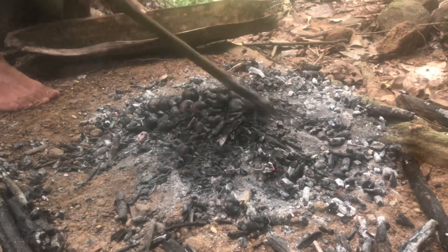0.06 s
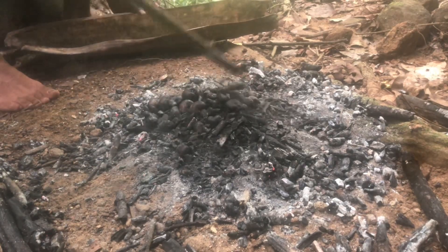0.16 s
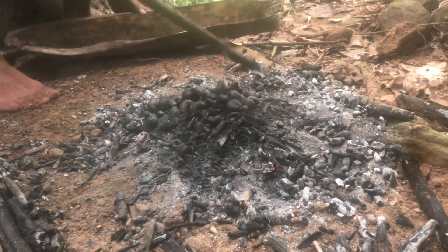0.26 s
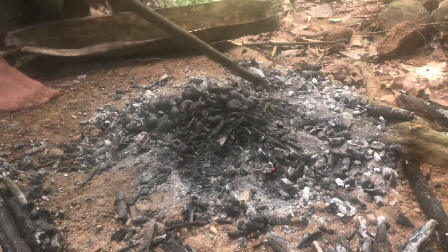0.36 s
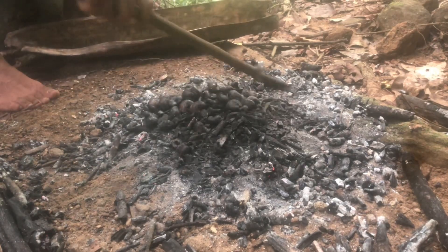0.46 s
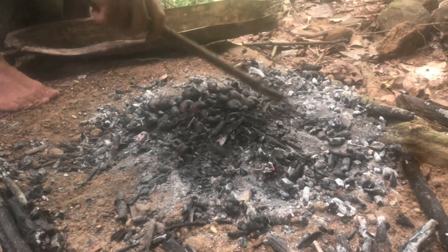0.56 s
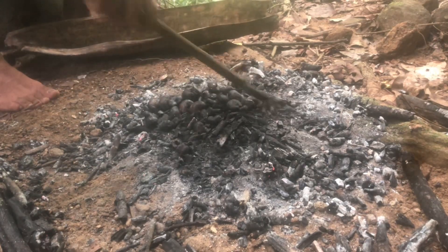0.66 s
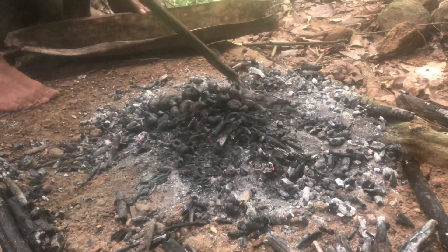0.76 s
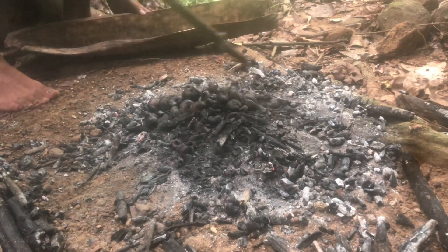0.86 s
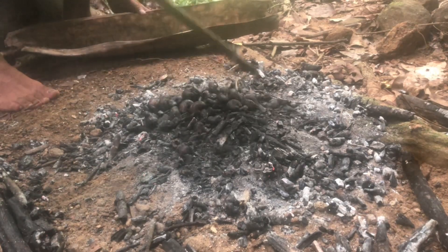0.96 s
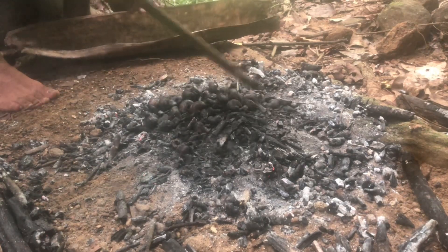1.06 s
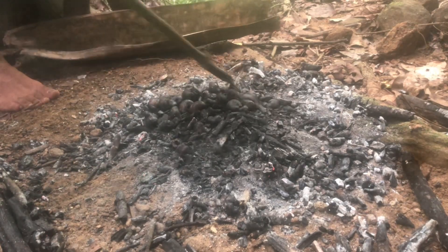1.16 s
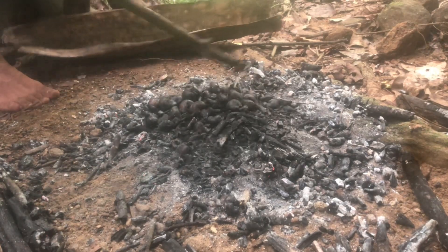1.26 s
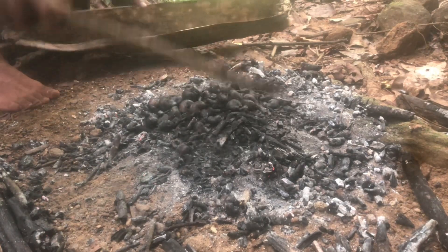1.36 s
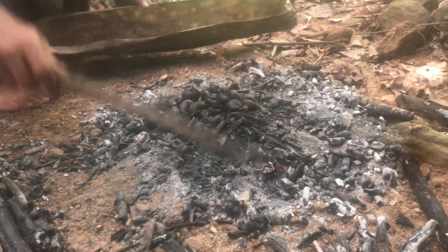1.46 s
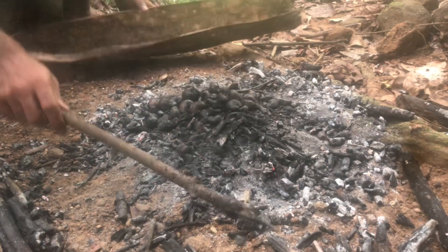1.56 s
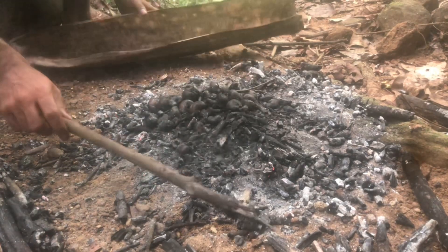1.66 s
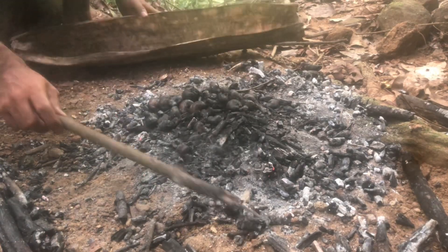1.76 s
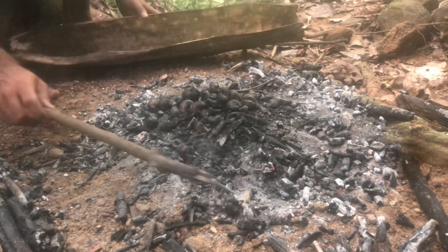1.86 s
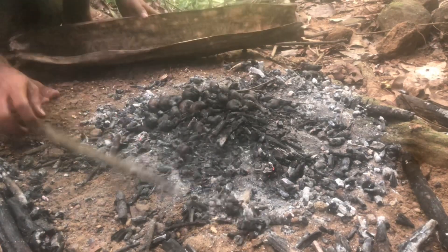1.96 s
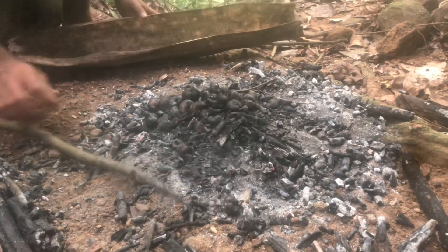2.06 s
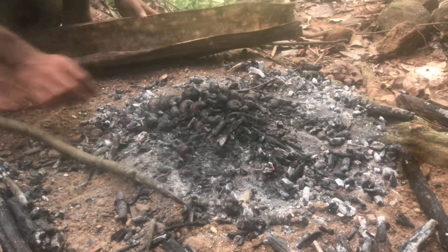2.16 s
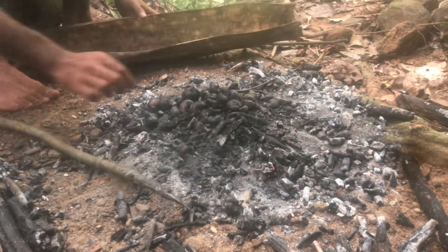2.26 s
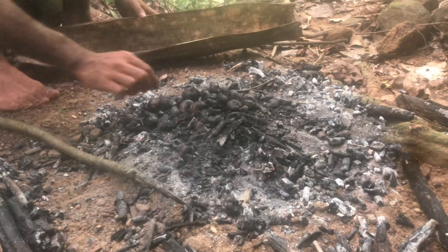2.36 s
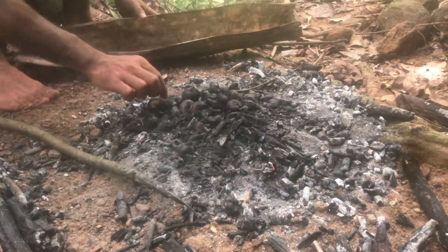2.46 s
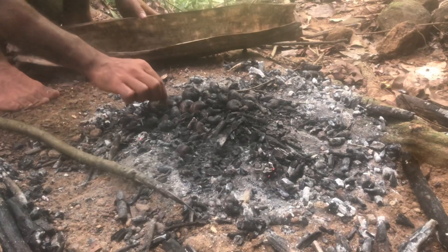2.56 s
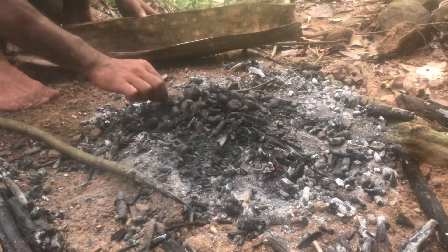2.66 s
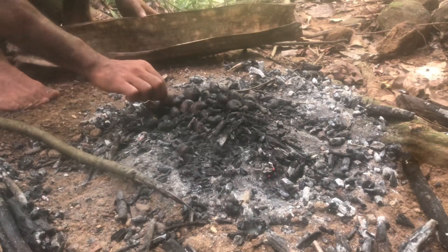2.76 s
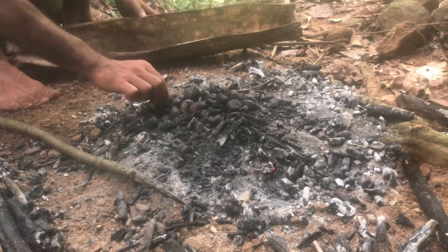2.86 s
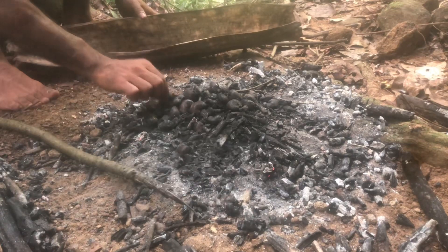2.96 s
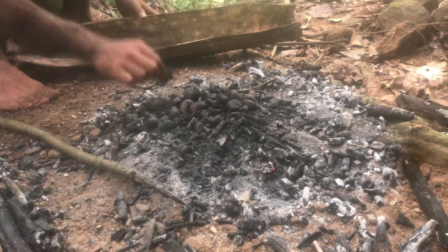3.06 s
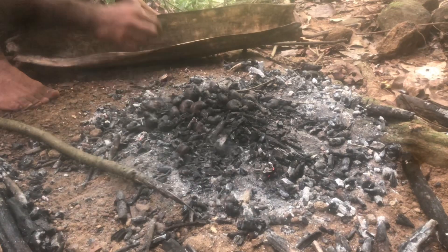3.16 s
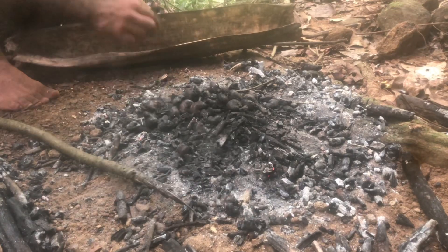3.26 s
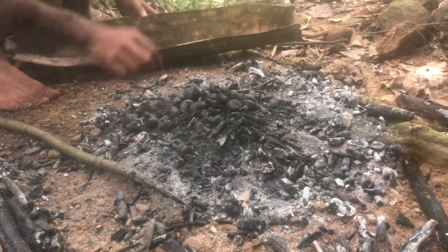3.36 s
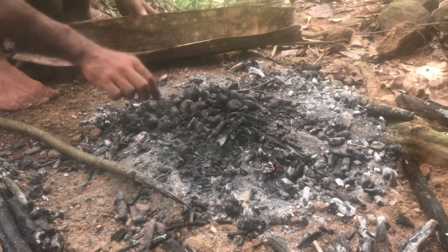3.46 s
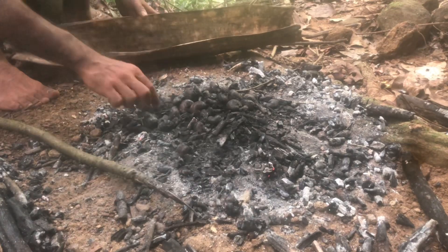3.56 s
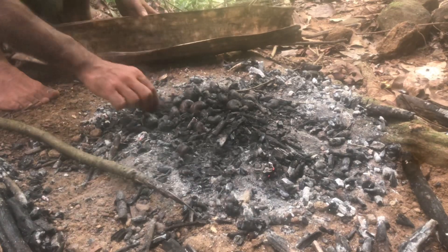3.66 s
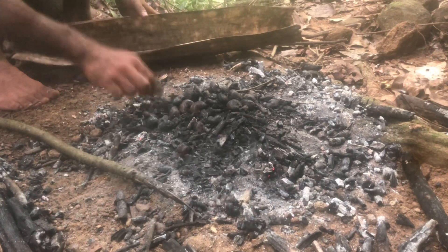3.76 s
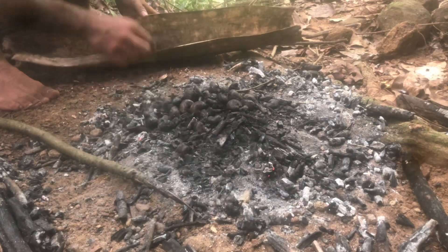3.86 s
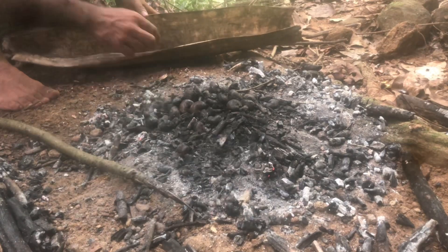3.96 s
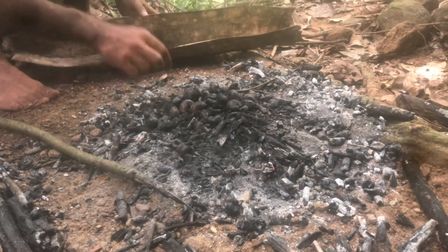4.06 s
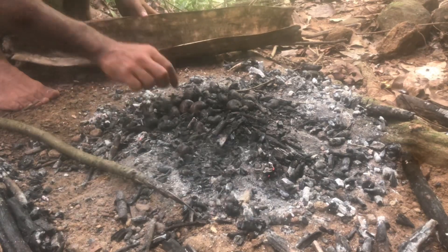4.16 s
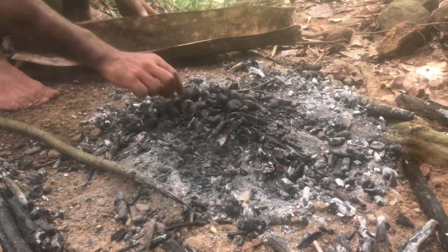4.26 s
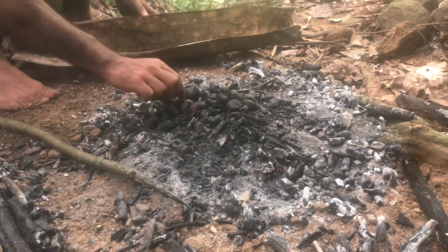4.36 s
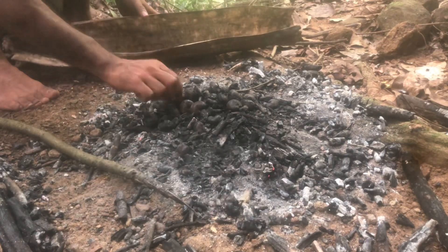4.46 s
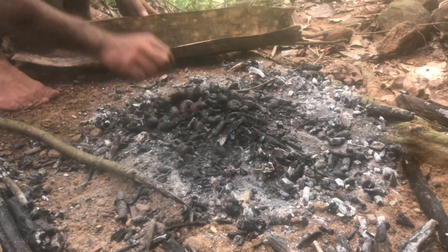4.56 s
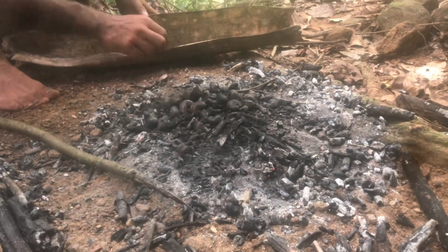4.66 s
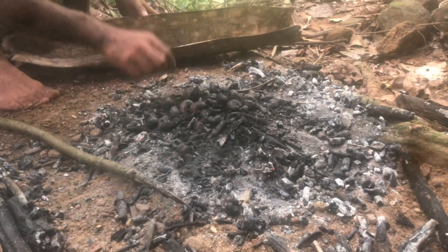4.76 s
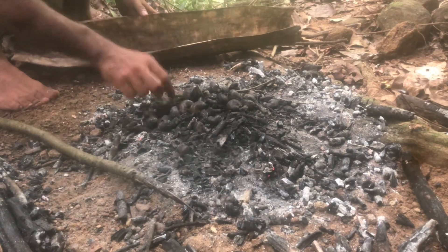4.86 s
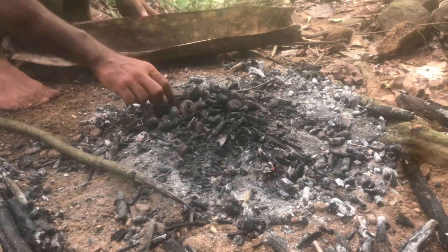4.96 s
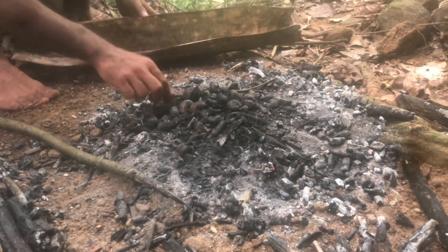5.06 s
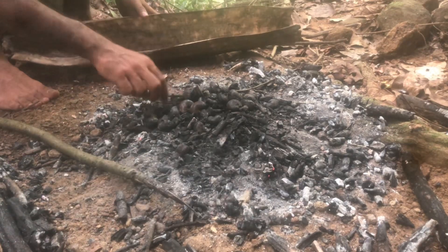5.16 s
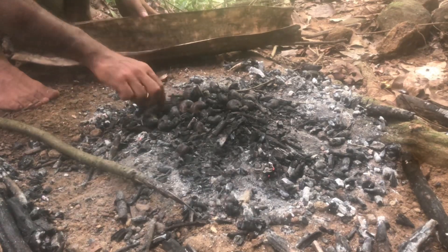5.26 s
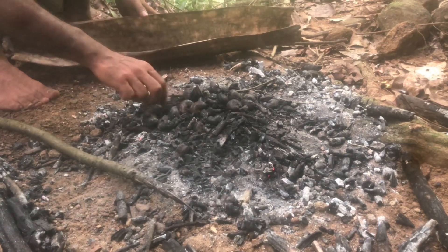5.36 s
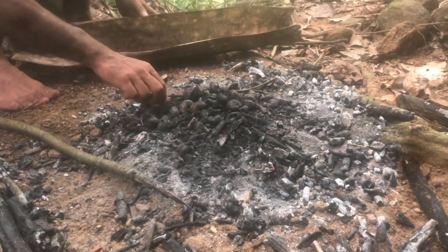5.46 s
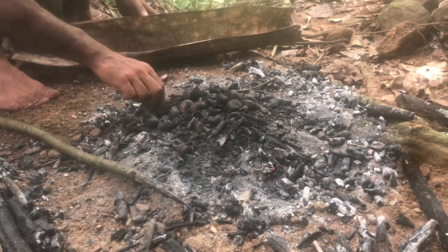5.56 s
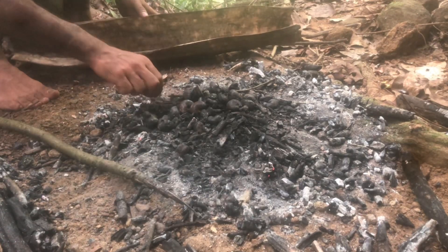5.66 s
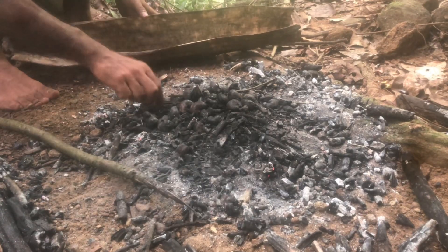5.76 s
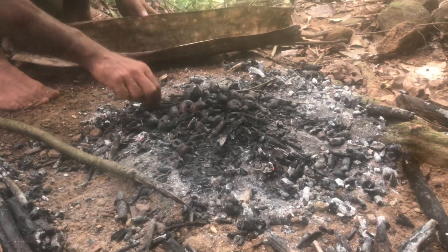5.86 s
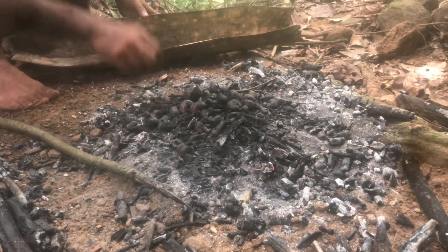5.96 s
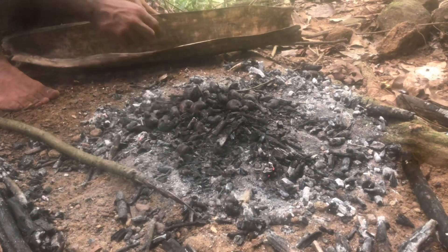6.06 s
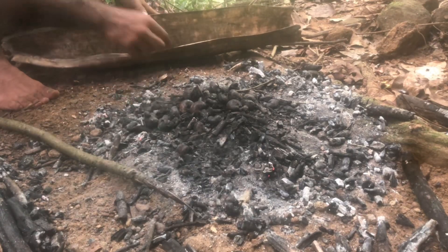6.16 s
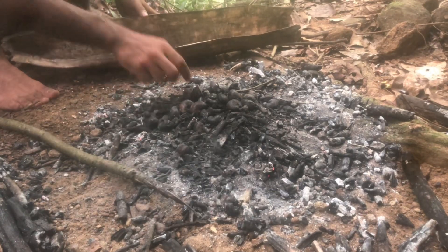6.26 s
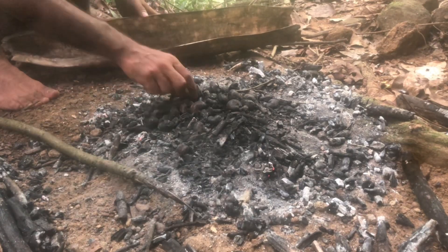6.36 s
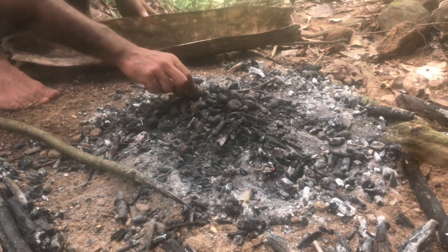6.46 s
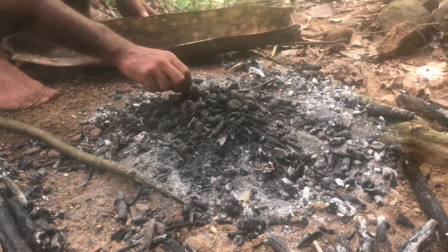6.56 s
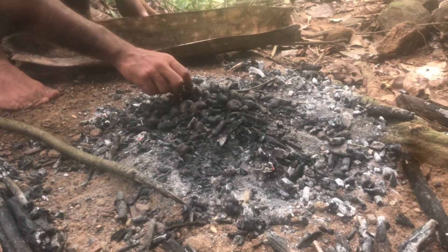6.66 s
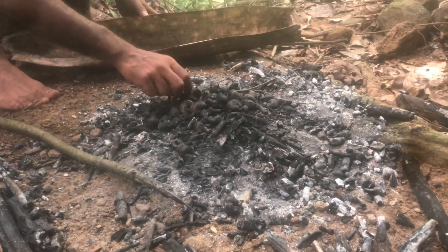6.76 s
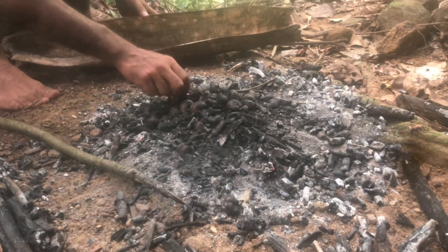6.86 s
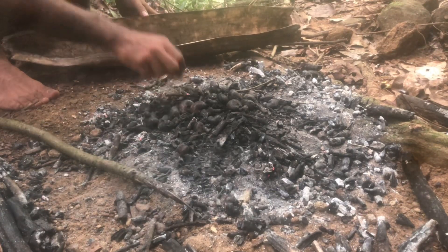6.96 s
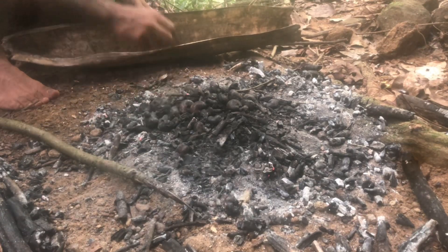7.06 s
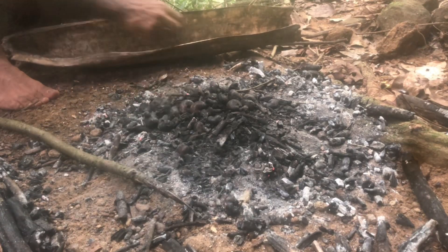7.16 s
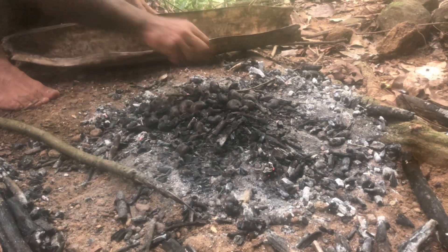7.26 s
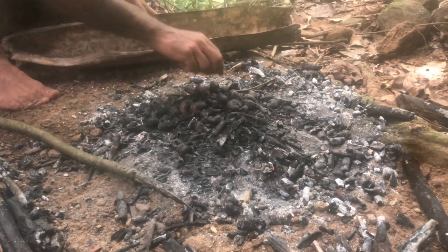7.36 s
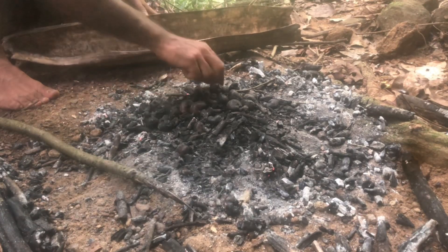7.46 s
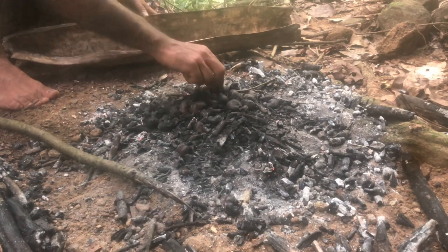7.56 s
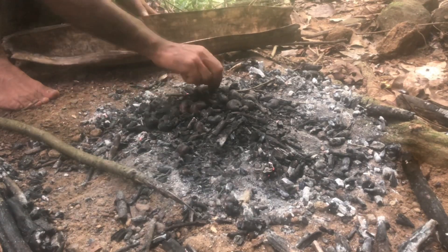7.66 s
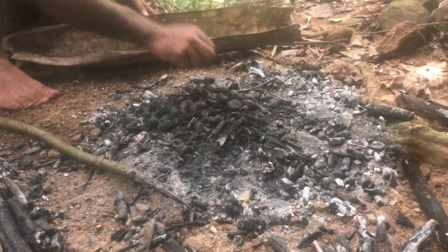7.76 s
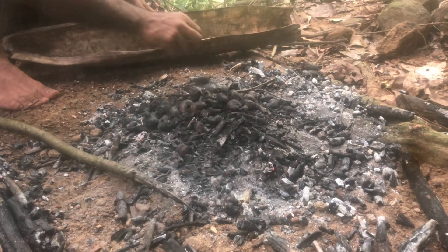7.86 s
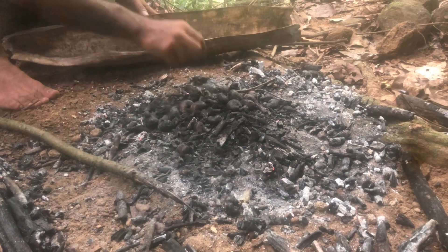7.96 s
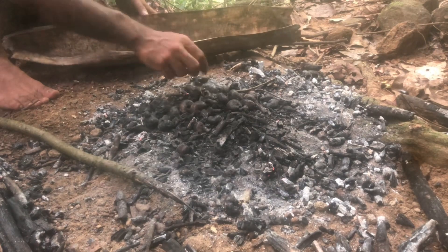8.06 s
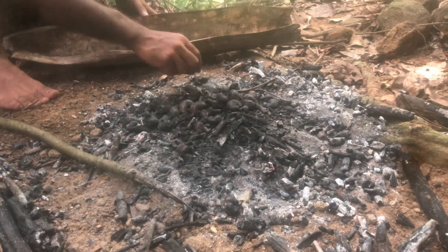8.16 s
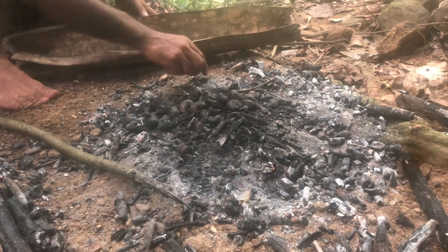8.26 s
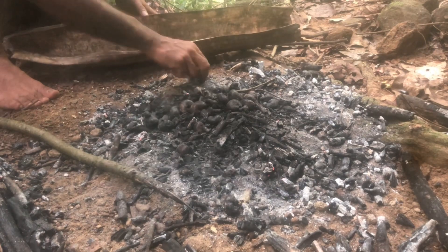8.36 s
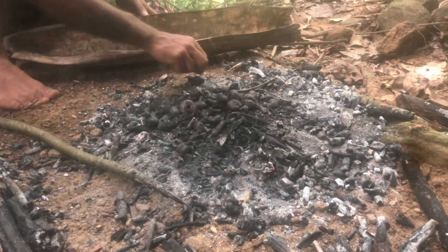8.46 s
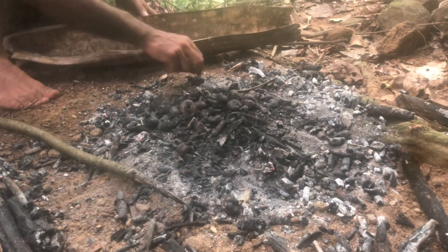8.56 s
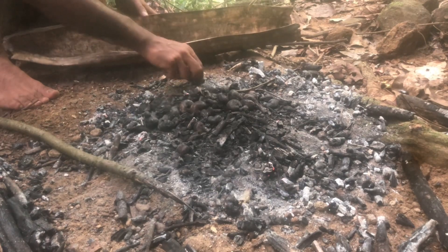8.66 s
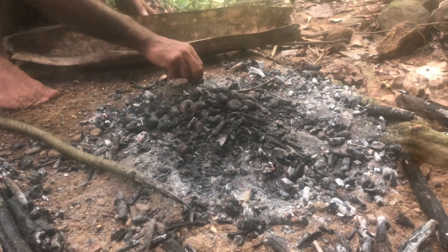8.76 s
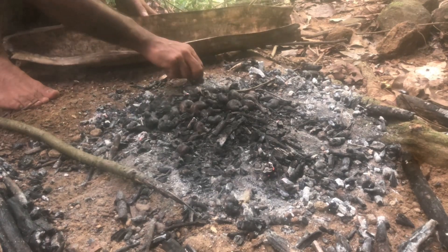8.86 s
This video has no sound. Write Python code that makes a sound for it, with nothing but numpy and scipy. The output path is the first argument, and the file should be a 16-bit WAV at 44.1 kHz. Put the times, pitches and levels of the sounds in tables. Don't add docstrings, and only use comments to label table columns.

```python
import sys
import numpy as np
from scipy import signal
from scipy.fft import rfft, irfft
from scipy.io import wavfile
from scipy.ndimage import uniform_filter1d

SR = 44100
rng = np.random.default_rng(int(sys.argv[2]) if len(sys.argv) > 2 else 0)


def amplitude_ratio(level_db):
    exponent = np.asarray(level_db, float) / 20
    return 10 ** exponent


def bounce(signal):
    frames = np.transpose(np.atleast_2d(signal))
    limited = np.clip(frames, -1, 1)
    pcm = np.round(limited * 32767).astype(np.int16)
    wavfile.write(sys.argv[1], SR, pcm)


N = 393372

# frequency in Hz, level in dB per Hz.
AIR_SPECTRUM = [(45, -10.5), (82, -10), (120, -4.5), (200, -11.5), (700, -17.5), (2400, -30), (14000, -35),
                (16000, -46)]
# time in seconds, level of the highest singers in dB.
INSECT_LEVELS = [(0.0, -79.5), (0.25, -91.5), (0.69, -84.5), (1.24, -76.5), (1.64, -89.5), (2.13, -80),
                 (2.4, -89.5), (2.8, -81.5), (3.72, -88), (4.2, -74), (4.819, -84), (5.86, -90.5),
                 (6.2, -81), (6.73, -85), (7.3, -79), (7.55, -87), (7.9, -79.5), (8.3, -89)]
# centre in Hz, width in Hz, level in dB.
MAIN_CHORUS = [(6550, 720, -4), (7540, 720, 0.5)]
# centre in Hz, width in Hz, level in dB.
HIGH_CHORUS = [(8784, 590, 0)]
# time in seconds, firing rate in Hz, level in dB.
ENGINE_COURSE = [
    (0, 25.06, -74.5),
    (.7, 26.3, -76.5),
    (1.12, 26.8, -70),
    (1.801, 29.11, -70),
    (2.401, 32.37, -69),
    (3.2, 34.75, -71.5),
    (3.35, 24.9, -67),
    (4.0, 24.6, -71),
    (4.6, 24.71, -74.5),
    (8.92, 24.6, -81.5),
]
# multiple of firing rate, level pulling in dB, level coasting in dB.
ENGINE_ORDERS = [(2, -4.5, -5.5), (3, -4, -14.5), (4, -4, -2.5), (5, 0.5, -0.5), (6, -8.5, -2.5),
                 (7, -11.5, -15)]
# start in seconds, length in seconds, level in dB.
RAKE_STROKES = [
    (.025, .1, -72.5),
    (.225, .04, -80.5),
    (.61, 0.0067, -74),
    (.68, 0.1, -72),
    (.815, .006, -77),
    (1.128, 0.0063, -69),
    (1.19, 0.016, -70),
    (1.592, 0.0052, -66),
    (2.05, 0.04, -76),
]
# frequency in Hz, level in dB per Hz.
GRIT_SPECTRUM = [(330, -9), (676, -1), (1290, -9), (1990, -8), (3420, -14.5), (6630, -12.5), (12100, -23),
                 (16000, -28)]
# time in seconds, peak in dB, ring in Hz, top above 8 kHz in dB.
CHARCOAL_SNAPS = [(0.0984, -57.5, 4030, -61), (0.124, -55.5, 6700, -75), (0.228, -60, 1960, -72.5),
                  (0.2583, -53.5, 2170, -81), (0.26, -55, 1090, -85), (0.5496, -54.5, 7800, -58),
                  (0.605, -49, 4530, -82), (0.6856, -48, 4800, -60), (0.718, -54, 2760, -60),
                  (0.809, -49.5, 4500, -62), (0.862, -63, 7240, -63), (1.047, -59, 1770, -81),
                  (1.0977, -53.5, 4160, -75), (1.1296, -43.5, 4630, -72), (1.1925, -50.5, 4280, -77),
                  (1.2186, -56, 1880, -83), (1.3832, -58, 2100, -77), (1.589, -56, 5775, -64),
                  (1.598, -47, 5270, -55), (1.797, -55.5, 2300, -80), (1.812, -55, 1990, -72),
                  (1.82, -57, 2380, -80), (2.0256, -35.5, 2300, -53.5), (2.1146, -54.5, 2630, -78),
                  (4.018, -72, 7500, -57), (4.9068, -65.5, 1786, -53), (5.0192, -68, 2750, -70),
                  (1.2163, -50.5, 4970, -78), (7.748, -66, 2400, -75), (7.945, -62, 2500, -75),
                  (.703, -57, 3000, -66), (0.751, -58, 4300, -60), (.77, -55, 4500, -70),
                  (0.821, -62, 4800, -70), (1.046, -63, 4220, -88), (1.2, -58, 4000, -78),
                  (7.2555, -60, 6500, -52), (7.337, -56, 4000, -59), (4.2692, -53, 2420, -77),
                  (7.265, -48, 2050, -80), (8.4, -68, 6770, -67), (8.743, -62.5, 1990, -76),
                  (8.77, -58, 7030, -67)]
# mode in Hz, level in dB, t60 in seconds.
STICK_MODES = [(700, -20, 0.082), (1430, -16, 0.11), (2296, 3.5, 0.028), (2840, 4, 0.024),
               (4120, 4.5, 0.017), (4200, -19, 0.03), (4530, 1, 0.019), (5400, -32.5, 0.039)]

# mode in Hz, level in dB, t60 in seconds.
BODY_MODES = [(256, -17.5, .06), (332.8, -16.5, 0.095), (435.7, -9, 0.043), (559, -4.5, 0.0454),
              (662, -2.5, .03), (826, -6, 0.04), (1040, -5.5, 0.047), (1250, -9.5, 0.014)]
# mode in Hz, level in dB, t60 in seconds.
WALL_MODES = [(1500, -0.5, 0.033), (1859, 7.5, .02), (2280, -2.5, .018), (2870, -8, 0.018)]
# frequency in Hz, level in dB per Hz.
WOOD_SPECTRUM = [(90, -26), (250, -2.5), (700, -2), (1100, -6.5), (1400, -16), (2000, -17.5), (2700, -30),
                 (5000, -44.5)]
# time in seconds, peak in dB, bright rings in dB, shell tick in dB, arrival spread in seconds.
LANDINGS = [
    (3.333, -22.5, -21.5, -51, 0.0021),
    (3.485, -10, -18, -57.5, 0.0016),
    (3.643, -27.5, -8, -57, 0.0014),
    (4.0715, -12.5, -20.5, -46.5, 0.0025),
    (4.2438, -18, -14, -48.5, 0.0013),
    (6.233, -14, -14, -49, .0011),
    (6.3952, -18, -18.5, -55.5, .0007),
    (7.2552, -14.5, -12.5, -41, .0015),
    (7.362, -30, -15, -57, 0.0013),
]
# mode in Hz, level in dB, t60 in seconds.
EARLY_SPOTS = [
    [(239, -10.5, 0.072), (385, -12, 0.056), (561, 3.5, 0.027), (728, -1, 0.037), (942, -4.5, 0.031),
     (1250, -17, 0.013)],
    [(390, -22, .07), (470, -14, 0.04), (666, -0.5, 0.032), (930, 1, 0.015), (1128, -16, 0.026),
     (1220, -14.5, 0.013)],
    [(504, 6, 0.013), (670, 3, 0.049), (943, 9, 0.016), (1147, -2.5, 0.059)],
    [(249, -15.5, 0.064), (407, -7, 0.045), (548, -1.5, 0.041), (602, 4, 0.026), (920, -11, 0.064),
     (1040, -25.5, 0.13)],
    [(239, -16.5, 0.074), (748, -9, 0.027), (1046, 4.5, 0.023), (1277, -4, 0.017), (1573, -18.5, 0.037)],
]
# mode in Hz, level in dB, t60 in seconds.
LATER_SPOTS = [
    [(251, -22.5, 0.071), (401.6, -4.5, 0.057), (556, 3.5, 0.038), (683, -1, 0.052), (952, -1, 0.032),
     (1160, -22.5, 0.14), (1486, -13, 0.018)],
    [(457, -6, 0.03), (700, 3, 0.026), (860, 9.5, 0.017), (1082, 2, 0.019), (1440, -16.5, 0.024)],
    [(240, -30, 0.015), (422.5, -2, 0.057), (676, 2, 0.034), (888, -9.5, 0.055), (1080, -12.5, 0.058)],
    [(280, -2.5, 0.047), (503, -8, 0.069), (834, 5, 0.018), (1070, -9, 0.059)],
]
# mode in Hz, level in dB, t60 in seconds.
SPOT_WALLS = [
    [(1794, 2, 0.019), (2120, 3, 0.02), (2880, -3, 0.015), (4280, -9, 0.011)],
    [(1400, -0.5, .025), (1900, 2, 0.027), (2920, -19, 0.014), (4405, -27, 0.012)],
    [(1400, -8, 0.018), (1700, 5, 0.012), (2600, -18, .012), (2900, -20, 0.014)],
    [(1870, 2.5, .018), (2100, -4.5, 0.025), (2880, -11.5, 0.018), (4960, -21.5, .009)],
    [(1700, -2, .016), (3010, -24, 0.016), (4110, -31, 0.011)],
    [(1530, -1.5, 0.0195), (1740, 0.5, .025), (2300, -9, .012), (4070, -26, 0.02), (5150, -22.5, 0.012)],
    [(1500, -5.5, .025), (1810, 9, 0.0082), (3150, -16, 0.012), (4050, -30, .01)],
    [(1810, 2.5, 0.018), (2100, -11, 0.042), (2580, -7, 0.018), (3000, -8, .014), (4500, -18, 0.0091)],
    [(1320, -7, 0.018), (1750, 1, .02), (2080, 5, 0.018)],
]
# time in seconds, peak in dB, strongest ring in Hz, bright rings in
# dB.
NUT_BOUNCES = [(3.35, -40.5, 643, -25), (3.365, -32.5, 623, -20), (3.379, -46, 740, -28),
               (3.422, -58.5, 912, -15), (3.51, -34, 686, -21.5), (3.521, -51, 557, -22.5),
               (3.574, -41.5, 865, -16), (3.595, -30, 675, -26), (3.689, -34.5, 700, -19),
               (3.738, -29.5, 618, -15.5), (3.763, -39, 880, -20), (3.774, -43, 1060, -19),
               (3.792, -44.5, 820, -21), (3.8, -51.5, 1040, -24), (3.464, -57, 900, -19.5),
               (3.961, -60, 1105, -3), (4.082, -35, 543, -22), (4.101, -42.5, 447, -35),
               (4.227, -33, 860, -21), (4.259, -26.5, 700, -19.5), (4.269, -30, 507, -14.5),
               (4.285, -39.5, 625, -17), (4.304, -35.5, 705, -19), (4.312, -34.5, 964, -22),
               (4.327, -41, 666, -22), (4.344, -46, 690, -12),
               (6.25, -32.5, 969, -25), (6.4029, -38, 720, -24), (7.392, -46, 487, -26),
                 (7.807, -57, 790, -20), (7.914, -59, 900, -22), (7.981, -53.5, 613, -22),
                 (6.29, -32, 600, -22), (6.371, -42.5, 630, -25), (6.3791, -39, 665, -34),
                 (6.428, -38.5, 670.5, -24), (7.268, -30, 450, -12), (7.28, -51, 420, -24),
                 (7.3, -59, 700, -15), (7.338, -33, 860, -22), (7.384, -39.5, 690, -26),
                 (7.439, -48, 503, -21), (7.463, -37.5, 662, -12), (7.476, -36, 810, -20),
                 (7.484, -41.5, 507, -18), (7.503, -36, 654, -20), (7.516, -41, 673, -28),
                 (7.534, -47, 673, -25), (7.774, -54, 650, -20), (7.797, -56, 917, -18),
                 (7.815, -43.5, 736, -21), (7.83, -44.5, 676, -23), (7.905, -43.5, 640, -19),
                 (7.967, -43, 643, -28), (8.11, -57.5, 947, -1), (8.218, -59, 608, -13)]
# time in seconds, peak in dB, strongest ring in Hz, bright rings in dB.
STICK_BRUSHES = [(1.011, -46.5, 672, -19), (1.134, -58.5, 1140, 8), (1.216, -40, 1082, -6.5),
                 (1.791, -51, 930, -20), (1.797, -47, 890, -19), (1.82, -58, 870, 0),
                 (1.809, -48.5, 830, -8), (1.837, -52, 700, -16), (1.895, -65, 930, -14),
                 (2.117, -56, 1240, -6), (2.196, -59.5, 896, -9), (2.485, -62, 684, -8)]
FIRM_TIMES_S = [3.365, 3.574, 3.595, 3.689, 3.738, 3.763, 3.774, 4.227, 4.259, 6.29, 6.428, 7.339, 7.463,
                7.476, 7.905, 7.968]
# mode in Hz, level in dB, t60 in seconds.
FIRM_SPOTS = [
    [(425, -7, .03), (650, 1, 0.041), (887, -7, 0.044)],
    [(705, -1, .03), (870, 1, 0.035), (1061, -9, .025)],
    [(492, -3.5, 0.033), (672, 1, 0.038), (1039, -5.5, 0.027)],
    [(684, 3, .03), (824, -5, 0.026), (1070, -1.5, 0.028)],
    [(620, 3, 0.022), (910, -6, 0.03), (1170, -17, 0.045)],
    [(673, -5, .02), (880, -3, .025), (1110, -9, 0.027)],
    [(700, -2, 0.033), (865, -1, .025), (1082, 0, 0.057)],
    [(495, -4.5, .03), (711, -4, .03), (870, -2, 0.034)],
    [(562, -5, .035), (694, -2.5, .03), (845, 1, 0.018), (1140, -10, 0.024)],
    [(599, -1.5, 0.046), (872, -13.5, .02)],
    [(592, 1.5, .03), (829, -6.5, .02)],
    [(467, -11, .035), (705, -1, 0.026), (860, 3, .03), (1087, -10, .02)],
    [(475, -1, 0.048), (640, -3, .03), (814, 0, 0.037), (1082, -11, 0.018)],
    [(565, -1, 0.032), (694, -2, 0.024), (800, 0, .03)],
    [(700, 2, 0.025), (923, -2.4, .018), (1240, -15, .012)],
    [(643, -2, 0.032), (900, -6, .018), (1300, -18, 0.01)],
]
# time in seconds, peak in dB, frequency in Hz, t60 in seconds.
GROUND_THUDS = [
    (3.338, -43.5, 94, 0.27),
    (3.335, -40, 155, 0.15),
    (3.493, -40, 132, .15),
    (3.738, -42, 160, 0.058),
    (4.073, -33.5, 118.6, 0.15),
    (4.251, -33, 158, 0.056),
    (6.235, -46, 124, 0.22),
    (6.4, -42.5, 166, 0.085),
    (7.26, -41, 112, 0.13),
    (7.37, -48, 163.4, 0.12),
]
# start in seconds, length in seconds, level in dB.
STICK_SCUFFS = [
    (1.222, 0.012, -56.5),
    (1.795, 0.034, -62),
    (1.843, .005, -65),
]
# start in seconds, length in seconds, level in dB.
NUT_ROLLS = [(3.34, 0.11, -75), (3.53, 0.24, -63.5), (3.87, 0.093, -71), (4.08, 0.082, -73.5),
             (4.25, 0.091, -57.5), (6.26, 0.056, -60.5), (6.405, 0.067, -65), (7.29, 0.081, -65),
             (7.37, 0.015, -54), (7.45, 0.097, -72), (7.76, 0.26, -82)]

STROKE_RISE_DB_PER_S, STROKE_FALL_DB_PER_S = 1200, 1100
USUAL_BOUNCE_DB = -41


def evened(x):
    return x / np.sqrt(np.mean(x ** 2) + 1e-20)


def peaked(x):
    return x / np.abs(x).max()


def read(points, hz):
    f, value = np.transpose(points)
    return np.interp(np.log(hz + 1), np.log(f + 1), value)


def add(mix, s, sound):
    part = mix[round(s * SR):][:len(sound)]
    fade = np.minimum(np.linspace(4, 0, len(sound)), 1)
    part += (sound * fade)[:len(part)]


def coloured(x, db_of):
    size = x.shape[-1]
    return irfft(rfft(x) * amplitude_ratio(db_of(np.fft.rfftfreq(size, 1 / SR))), size)


def slopes(hz, below_db, above_db):
    def db_of(f):
        octaves = np.log2((f + 1) / hz)
        return np.minimum(below_db * octaves, -above_db * octaves)
    return db_of


def ring(t, hz, db, t60, cycles, glide=0.):
    turns = hz * (t + glide * 0.0014 * (1 - np.exp(-t / 0.00096)))
    swell = (1 - np.exp(-t * hz / cycles)) ** 2
    return amplitude_ratio(db - 60 * t / t60) * swell * np.sin(2 * np.pi * turns)


def strokes(rows, rise, fall):
    t = np.arange(0, N + 32, 32) / SR
    gain = 0
    for s, length, db in rows:
        before, after = np.maximum(s - t, 0), np.maximum(t - s - length, 0)
        gain = gain + amplitude_ratio(db - rise * before - fall * after)
    return np.interp(np.arange(N) / SR, t, gain)


def impulses(rate_hz, spread_db):
    size = amplitude_ratio(spread_db * np.minimum(rng.exponential(1, N), 4))
    return size * (rng.random(N) < rate_hz / SR) * rng.choice([-1, 1], N)


def patchy(db_of, patchy_db, size):
    frames, hz = N // 256 + 5, np.fft.rfftfreq(1024, 1 / SR)
    a, b, patches = rng.standard_normal((frames, 513, 3)).T
    patches = uniform_filter1d(patches, size=size, axis=0)
    patches = evened(uniform_filter1d(patches, size=12, axis=1))
    z = (a + 1j * b) * amplitude_ratio(db_of(hz)[:, None] + patchy_db * patches)
    return evened(signal.istft(z, nperseg=1024, noverlap=768)[1][:N])


def air():
    return amplitude_ratio(-68.5) * patchy(lambda hz: read(AIR_SPECTRUM, hz), patchy_db=.6, size=10)


def insects(level_db, chorus):
    def bands(hz):
        power = sum(amplitude_ratio(db) ** 2 * np.exp(-((hz - f) / w) ** 2) for f, w, db in chorus)
        return 10 * np.log10(power + 1e-9)
    return amplitude_ratio(level_db - 2.0) * patchy(bands, patchy_db=2.0, size=5)


def engine():
    coast_s, waver_db = 3.28, 3.5
    s, hz, db = np.transpose(ENGINE_COURSE)
    t = np.arange(N) / SR
    turns = np.cumsum(np.interp(t, s, hz)) / SR
    wavers = np.clip(rng.standard_normal((len(ENGINE_ORDERS), 40)), -1.2, 1.2)
    orders = np.zeros(N)
    for (k, pull_db, coast_db), w in zip(ENGINE_ORDERS, wavers):
        waver = waver_db * np.interp(t, np.linspace(0, t[-1], len(w)), w)
        order_db = np.where(t < coast_s, pull_db, coast_db) + waver
        orders += amplitude_ratio(order_db) * np.cos(2 * np.pi * (k * turns + w[0]))
    fade = np.clip((s[-1] - t) / 0.2, 0, 1)
    return amplitude_ratio(np.interp(t, s, db) + 1.5) * fade * evened(orders)


def raking():
    grains = impulses(rate_hz=6000, spread_db=3.5)
    sound = coloured(grains, lambda f: read(GRIT_SPECTRUM, f) + 1.3 * np.log2(f / 4000 + 0.11))
    in_band = coloured(sound, lambda f: -100 * ((f < 2000) | (f > 6000)))
    return strokes(RAKE_STROKES, STROKE_RISE_DB_PER_S, STROKE_FALL_DB_PER_S) * sound / in_band.std()


def charcoal():
    out, t = np.zeros(N), np.arange(2048) / SR
    hiss = rng.standard_normal((len(CHARCOAL_SNAPS), 2, len(t)))
    for (s, db, hz, top_db), (a, b) in zip(CHARCOAL_SNAPS, hiss):
        t60 = 0.016 + 16 / hz
        crack = coloured(a * amplitude_ratio(-60 * t / t60), slopes(hz, below_db=8.0, above_db=12.5))
        ping = .4 * ring(t, hz, 0, .7 * t60, cycles=.4)
        spit = coloured(b * amplitude_ratio(-60 * t / 0.015), slopes(11800, below_db=12.0, above_db=24.0))
        add(out, s, amplitude_ratio(db) * peaked(peaked(crack) + ping) + amplitude_ratio(top_db + 5.0) * peaked(spit))
    return out


def stick_drop():
    out, t = np.zeros(N), np.arange(2048) / SR
    wood = sum(ring(t, hz, db, 0.59 * t60, cycles=1.0) for hz, db, t60 in STICK_MODES)
    hiss = rng.standard_normal(len(t)) * amplitude_ratio(-60 * t / 0.11)
    dust = coloured(hiss, slopes(2200, below_db=-1.5, above_db=29.0))
    ground = ring(t - .004, 152, -11, 0.039, cycles=0.28) * (t > .004)
    add(out, 2.0252, amplitude_ratio(-29) * (peaked(wood) + amplitude_ratio(-14) * peaked(dust) + ground))
    return out


def wood_db(hz):
    lift_db, width = 4.5, 0.038
    lift = sum(np.exp(-((hz / f - 1) / width) ** 2) for f, _, _ in BODY_MODES + WALL_MODES)
    return read(WOOD_SPECTRUM, hz) + lift_db * lift


def late(t, hz, spread_s):
    return np.maximum(t - spread_s * (700 / hz) ** .9, 0)


def contacts():
    knocks = []
    for row, spot, walls in zip(LANDINGS, EARLY_SPOTS + LATER_SPOTS, SPOT_WALLS):
        knocks.append((*row, spot, walls, False))
    for s, db, hz, bright_db in NUT_BOUNCES + STICK_BRUSHES:
        t60 = 0.036 / amplitude_ratio(0.5 * (db - USUAL_BOUNCE_DB))
        spot = [(hz, 0, t60)]
        for firm_s, firm_spot in zip(FIRM_TIMES_S, FIRM_SPOTS):
            if abs(firm_s - s) < .004:
                spot = firm_spot
                break
        knocks.append((s, db, bright_db, -61.5, .0019, spot, WALL_MODES, True))
    return knocks


def body_ring(t, spread_s, spot, loose, vary, shift):
    modes = list(spot)
    if loose:
        own_db = -5.5 * (len(spot) > 1)
        for (f, db, t60), v, u in zip(BODY_MODES, vary, shift):
            far_db = own_db - 6.0 * abs(np.log2(f / spot[0][0]))
            modes.append((f * (1 + 0.059 * u), db + far_db + 5.5 * v, t60))
    return sum(ring(late(t, f, spread_s), f, db, .85 * t60, cycles=0.45, glide=0.15) for f, db, t60 in modes)


def wall_ring(t, spread_s, walls, loose, vary, shift):
    out = 0
    for (f, db, t60), v, u in zip(walls, vary[::-1], shift[::-1]):
        hz = f * (1 + loose * 0.033 * u)
        out = out + ring(late(t, f, spread_s), hz, db + loose * 2.0 * v, t60, cycles=0.47)
    return out


def trough():
    out, t, knocks = np.zeros(N), np.arange(SR // 5) / SR, contacts()
    luck = rng.standard_normal((len(knocks), 2, len(BODY_MODES) + len(WALL_MODES)))
    hiss = rng.standard_normal((len(knocks), 2, len(t)))
    hums = evened(coloured(hiss[:, 0], wood_db)) * amplitude_ratio(-21.5 - 60 * t / 0.16) * (1 - np.exp(-t / 0.014))
    touched = t > .002
    for knock, (vary, shift), (a, b), hum in zip(knocks, luck, hiss, hums):
        s, db, bright_db, tick_db, spread_s, spot, walls, loose = knock
        body = body_ring(t, spread_s, spot, loose, vary, shift)
        wall = wall_ring(t, spread_s, walls, loose, vary, shift)
        tick = coloured(b * touched * amplitude_ratio(-60 * t / 0.016), slopes(5100, below_db=8.0, above_db=8.5))
        clack = coloured(a * touched * amplitude_ratio(-60 * t / .008), slopes(1800, below_db=3.5, above_db=19.0))
        bright = peaked(wall) + amplitude_ratio(-7) * peaked(clack)
        after = amplitude_ratio(-0.1136 * (db - USUAL_BOUNCE_DB)) * hum
        sound = amplitude_ratio(db) * (peaked(body) + amplitude_ratio(bright_db) * bright + after)
        add(out, s - .0011, sound + amplitude_ratio(tick_db) * peaked(tick))
    for s, db, hz, t60 in GROUND_THUDS:
        add(out, s, ring(t, hz, db, t60, cycles=0.6))
    return out


def rolling():
    rough = impulses(rate_hz=500, spread_db=4.0) + 0.29 * rng.standard_normal(N)
    roll = evened(coloured(rough, wood_db))
    scuff = evened(coloured(rough, slopes(710, below_db=6.0, above_db=13.5)))
    scuffs = strokes(STICK_SCUFFS, STROKE_RISE_DB_PER_S, STROKE_FALL_DB_PER_S) * scuff
    return strokes(NUT_ROLLS, rise=299.5, fall=296) * roll + scuffs


def scene():
    high_db = np.interp(np.arange(N) / SR, *np.transpose(INSECT_LEVELS))
    main_db = -74.5 + 0.14 * (high_db - high_db.mean())
    bush = air() + insects(main_db, MAIN_CHORUS) + insects(high_db, HIGH_CHORUS) + engine()
    fire = raking() + charcoal() + stick_drop()
    return (bush + fire + trough() + rolling())[None]


def band_limit(x):
    return signal.sosfilt(signal.butter(12, 16130, fs=SR, output="sos"), x)


def record(dry):
    def chain_db(hz):
        shelf_db = -14 / (1 + np.exp((15150 - hz) / 120))
        bass_cut_db = 10 * np.log10(1 + (37.8 / (hz + 1)) ** 6)
        return shelf_db - bass_cut_db
    return band_limit(coloured(dry[0], chain_db)[None])


dry = scene()
out = record(dry)
bounce(out)
```